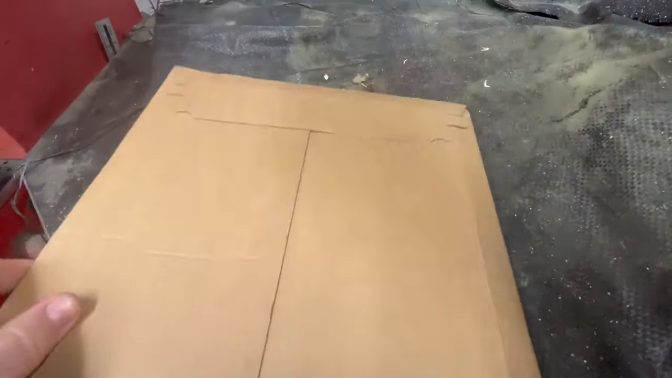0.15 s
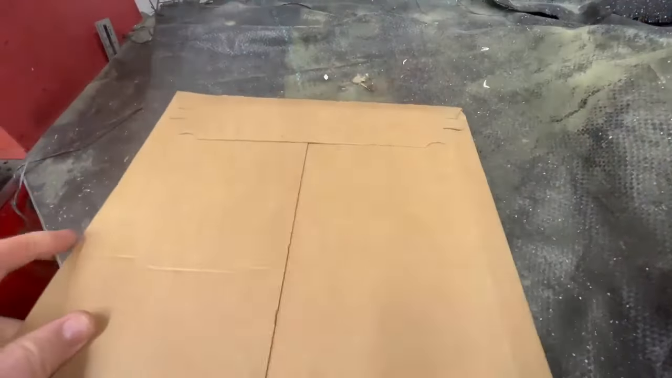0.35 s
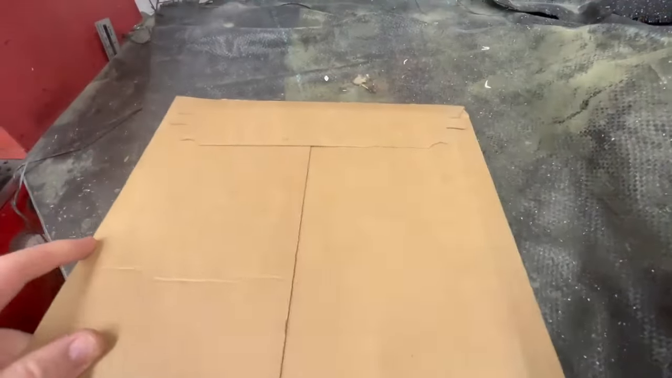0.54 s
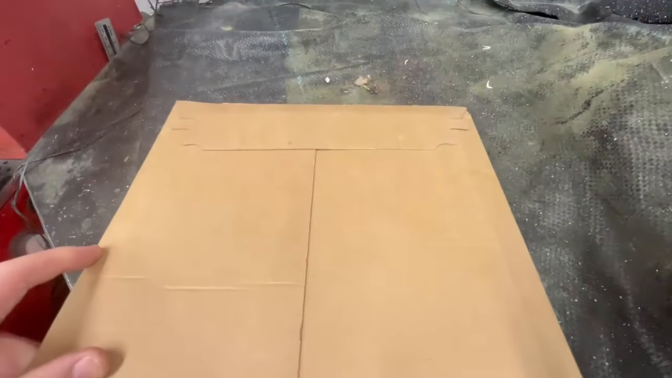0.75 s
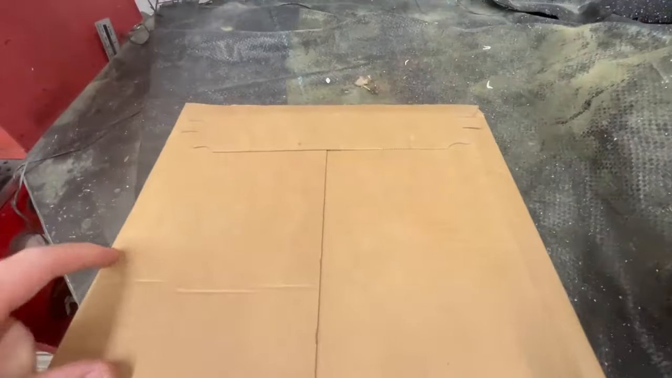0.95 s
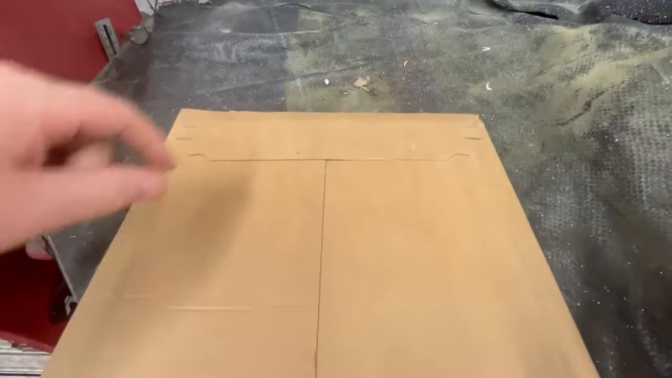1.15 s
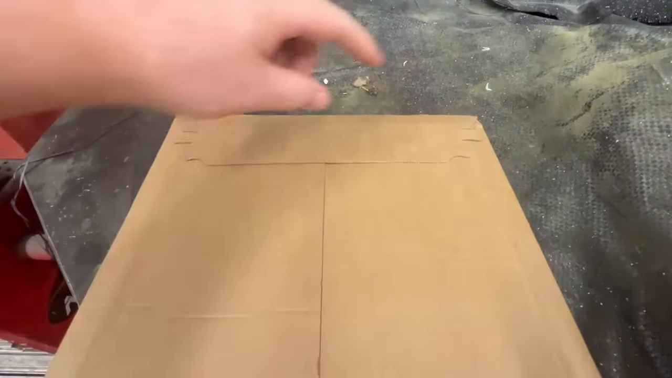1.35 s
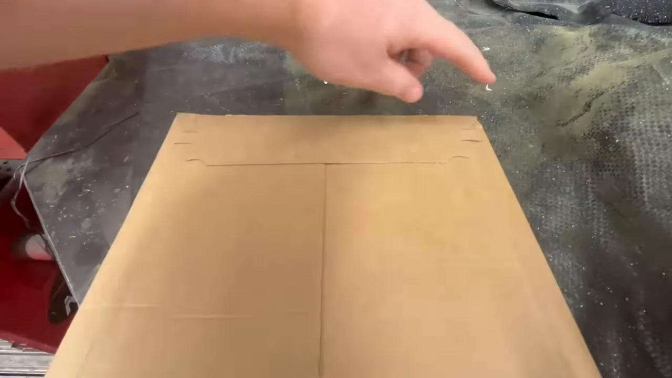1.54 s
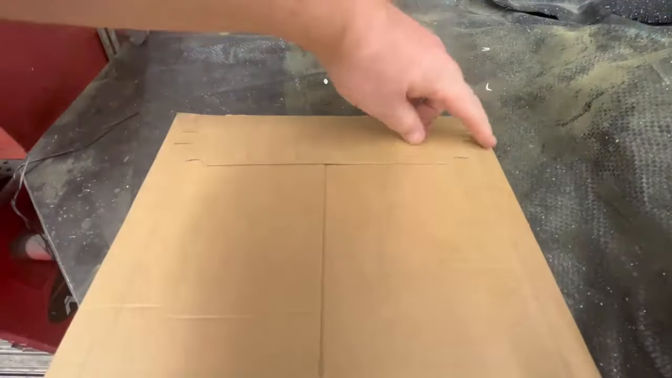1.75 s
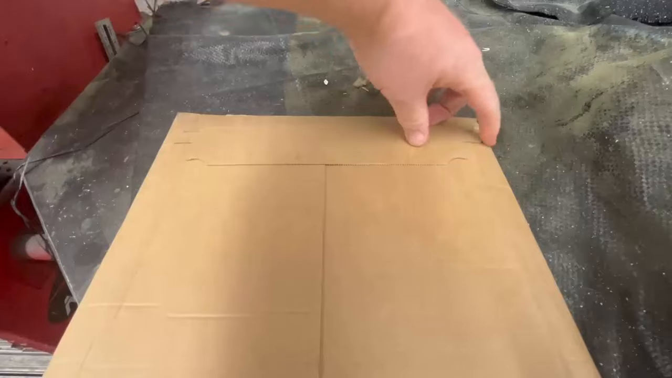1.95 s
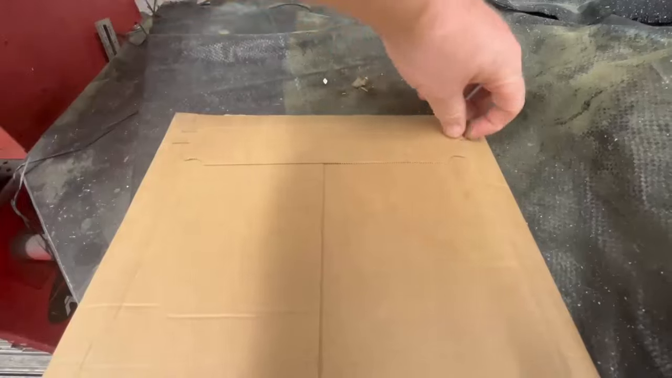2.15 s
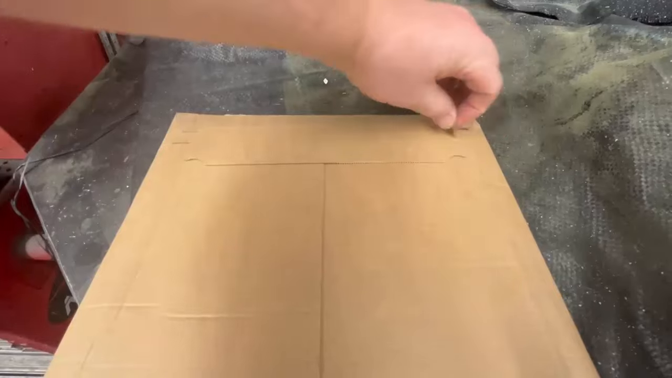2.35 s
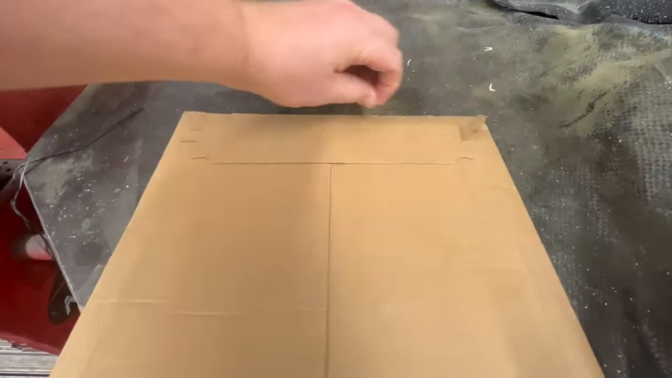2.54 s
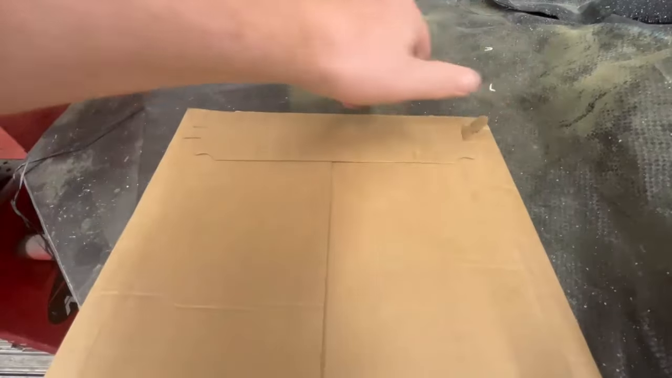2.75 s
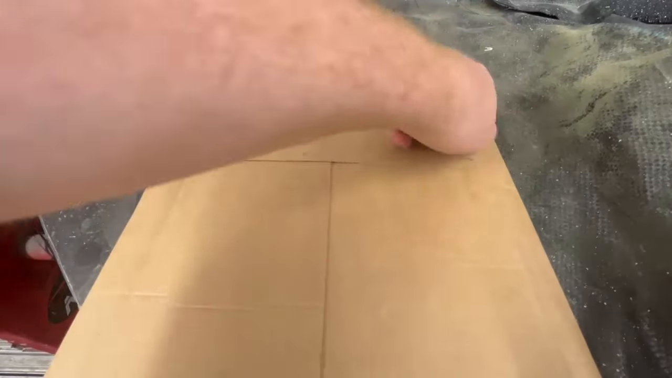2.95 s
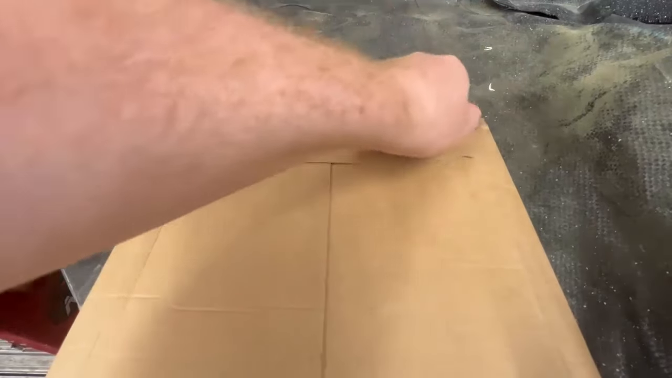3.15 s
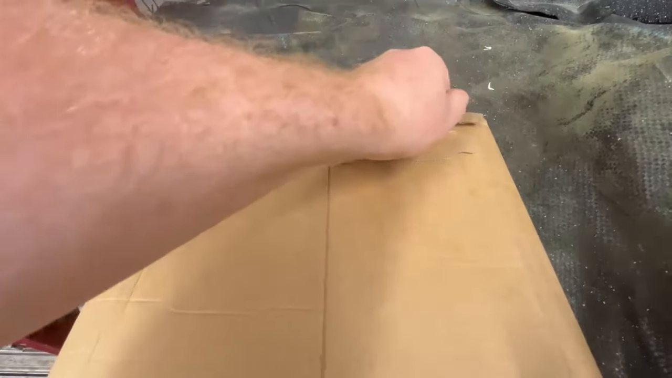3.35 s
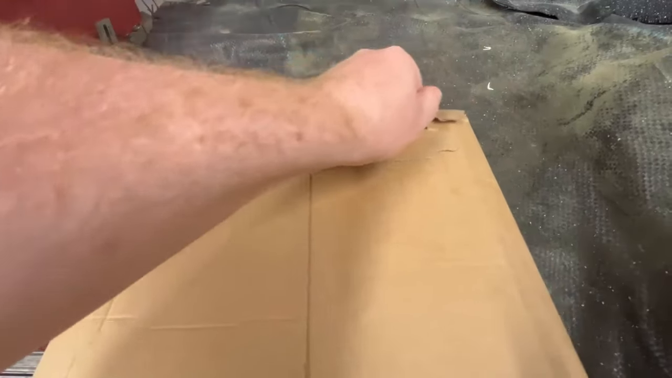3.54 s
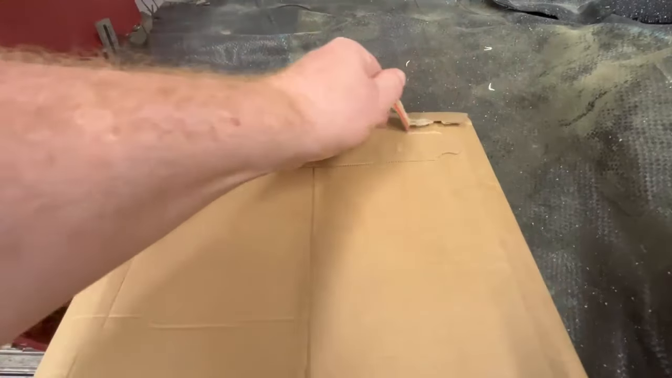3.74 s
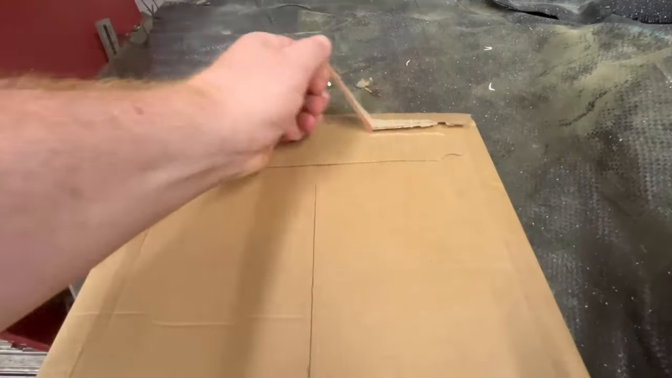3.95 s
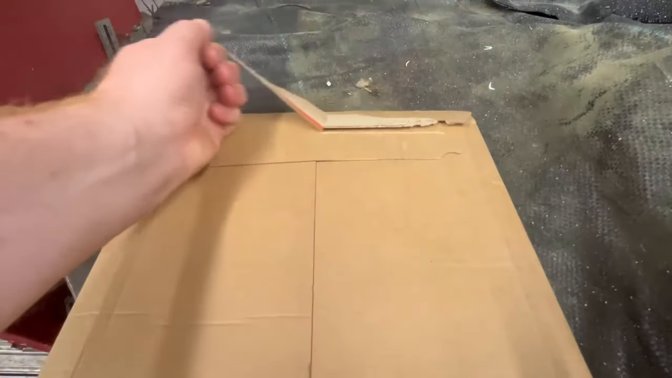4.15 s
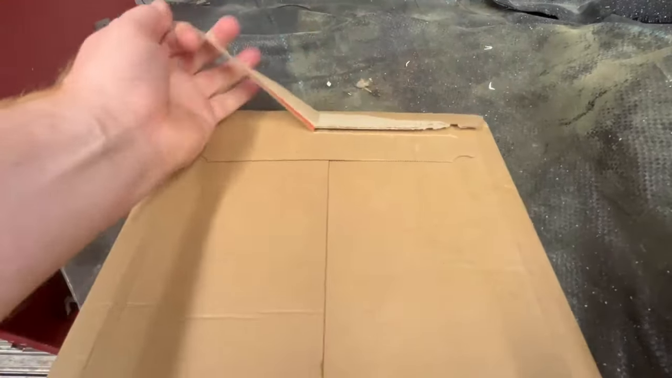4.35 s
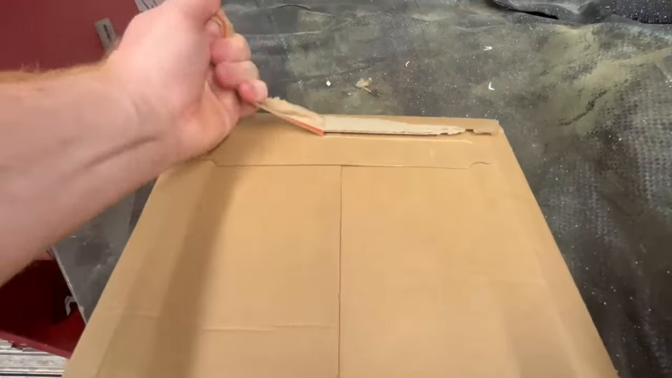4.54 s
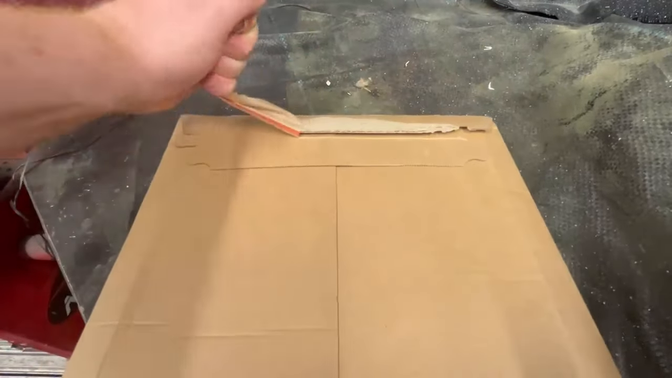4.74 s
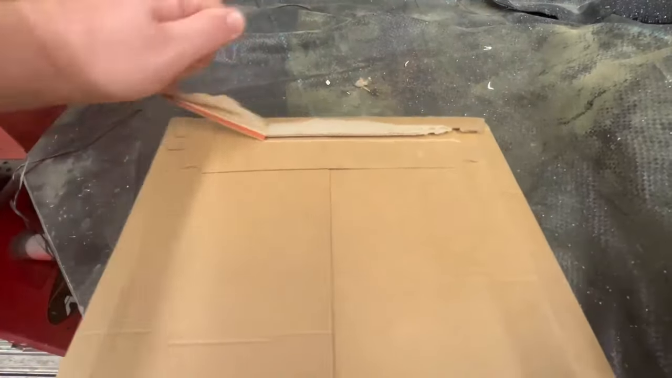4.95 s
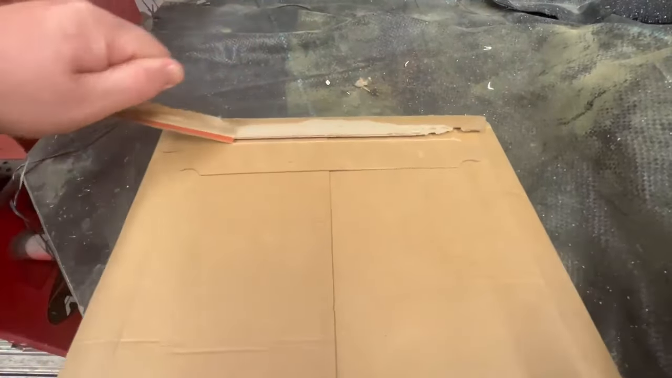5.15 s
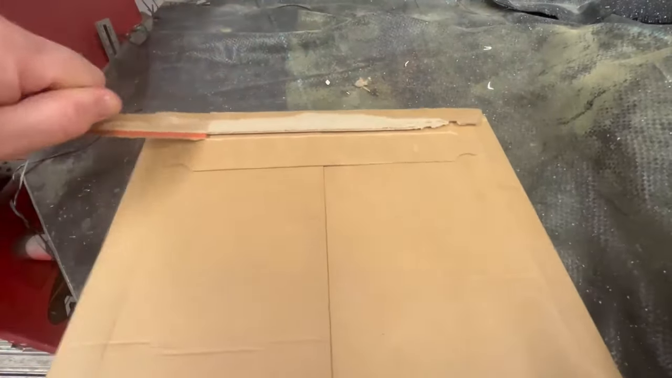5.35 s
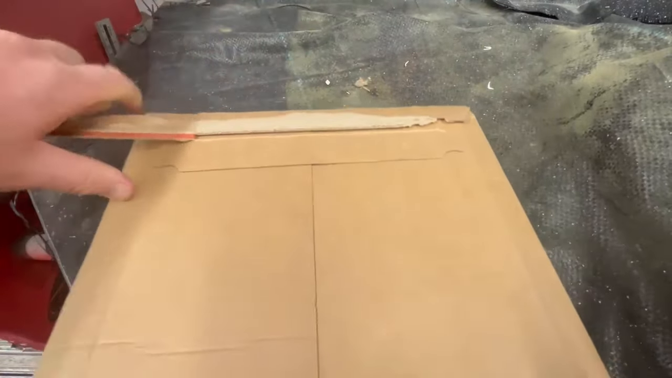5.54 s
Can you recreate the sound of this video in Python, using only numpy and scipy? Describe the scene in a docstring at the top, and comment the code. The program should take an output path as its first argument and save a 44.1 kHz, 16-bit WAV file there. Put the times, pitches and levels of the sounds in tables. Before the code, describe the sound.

Quiet rubbing and small knocks of a cardboard mailer, a hollow pop, then loud dry tearing along perforations, close up in a small workshop.

```python
"""Stiff card rasps over a workbench in faint room air; nails pick at a tab, then the mailer rips along its tear strip.
Rubbing is fine friction grain; knocks and rips are short bursts of cracks, each with a low thump.
The tear, one long pull among shorter tugs, is a train of snapping perforations with sprays of breaking fibres.
The sheet carries its plucks as bending waves whose lows arrive last; a small room and a pair of ports shape the stereo."""
import sys
import numpy as np
from scipy import signal
from scipy.fft import rfft, irfft, next_fast_len
from scipy.io import wavfile
from scipy.ndimage import uniform_filter1d

SR = 44100
rng = np.random.default_rng(int(sys.argv[2]) if len(sys.argv) > 2 else 0)


def bounce(signal):
    """Save signal as a 16-bit WAV file at the path given by the first command-line argument."""
    frames = np.transpose(np.atleast_2d(signal))
    limited = np.clip(frames, -1, 1)
    pcm = np.round(limited * 32767).astype(np.int16)
    wavfile.write(sys.argv[1], SR, pcm)


N = 246519
TIME = np.arange(N) / SR
SIZE = next_fast_len(N + SR // 2)  # room for tails
HZ = np.maximum(np.arange(SIZE // 2 + 1) * SR / SIZE, 1)
HALVES = np.array([[.5], [-.5]])  # splits a left-right difference between the ports


def from_db(db):
    """Decibels to gain."""
    return np.exp(np.asarray(db) * (np.log(10) / 20))


def to_db(power):
    """Power to decibels."""
    return 10 * np.log10(power + 1e-14)


def in_time(rows):
    """Each column of a curve at every sample."""
    s, *columns = np.transpose(rows)
    return [np.interp(TIME, s, column) for column in columns]


def at_hz(points):
    """A curve over log frequency, read at every frequency."""
    hz, value = np.transpose(points)
    return np.interp(np.log(HZ), np.log(hz), value)


def unit(x):
    """Scale to rms 1."""
    return x / np.sqrt(np.mean(np.abs(x) ** 2) + 1e-20)


def colour(points):
    """A response that passes white noise at unchanged power, thinned below 20 Hz."""
    low_cut = HZ ** 2 / (HZ ** 2 + 20 ** 2)
    return unit(from_db(at_hz(points)) * low_cut)


def through(x, response):
    """Filter by a frequency response."""
    return irfft(rfft(x, SIZE) * response, SIZE)[..., :N]


def drift(per_s):
    """Slow random wandering of spread 1."""
    count = N // 16
    hz = np.arange(count // 2 + 1) * SR / N
    slow = irfft(rfft(rng.standard_normal(count)) / (1 + (hz / per_s) ** 4), count)
    return np.interp(TIME, np.linspace(0, N / SR, count), unit(slow))


def evened(x, span_s):
    """Hold the power near 1 over a short span, keeping the finer grain."""
    power = uniform_filter1d(np.mean(np.atleast_2d(x) ** 2, axis=0), int(span_s * SR))
    return x / np.sqrt(np.maximum(power, 1e-9))


def ports(three, alike):
    """One shared and two separate signals become a left-right pair."""
    alike = np.clip(alike, 0, 1)
    return np.sqrt(alike) * three[0] + np.sqrt(1 - alike) * three[1:]


def panned(pan_db):
    """Left and right gains for a left-right difference."""
    return from_db(pan_db * HALVES)


def grains(per_s, spread_db, alike):
    """Small contacts slip or break: random clicks of uneven size and either sign, rms 1."""
    chance = rng.random((3, N)) * SR / per_s
    hit = chance < 1
    clicks = np.zeros((3, N))
    clicks[hit] = from_db(spread_db * np.minimum(-np.log(chance[hit] + 1e-12), 4))
    signs = 2 * rng.integers(2, size=(3, N), dtype=np.int8) - 1
    return unit(ports(clicks * signs, alike))


def resonance(x, hz, width_hz):
    """A band-pass with gain 1 at its centre, which may move."""
    turn = np.exp(2j * np.pi * np.cumsum(hz * np.ones(x.shape[-1])) / SR)
    r = np.exp(-np.pi * width_hz / SR)
    return 2 * np.real(turn * signal.lfilter([1 - r], [1, -r], x * turn.conj()))


def stroke(start, length, attack_s, release_s):
    """Attack, hold and release of one movement of the hand."""
    age = np.maximum(TIME - start, 0)
    return (1 - np.exp(-age / attack_s)) * np.exp(-np.clip((age - length) / release_s, 0, 30))


# Spectrum of the room's own noise: pitch_hz, relative_db
ROOM_AIR = [(25, -23), (60, 18), (110, 16.5), (180, 0.5), (330, 1.5), (600, -26), (900, -9), (1300, 1),
            (1650, 6), (2100, 1), (3000, -24), (4500, -10.5), (7000, -28), (16000, -47)]


def background(air_db=-63.0, hum_hz=99, hum_width_hz=8, hum_db=-61.0, hum_quiet_db=-71.0):
    """Room air is coloured noise; the wavering low hum is a narrow noise band that swells, then sinks after 1.2 s."""
    air = through(ports(rng.standard_normal((3, N)), 0.2), colour(ROOM_AIR))
    hum_band = unit(1 / (1 + ((HZ - hum_hz) / hum_width_hz) ** 2))
    hum = evened(through(rng.standard_normal(N), hum_band), 0.48)
    hum_level_db = np.interp(TIME, [0, .6, 1.2, 1.55], [hum_quiet_db, hum_db, hum_db, hum_quiet_db])
    return from_db(air_db) * air + hum * from_db(hum_level_db)


# Card sliding on the bench and under the hands, before layer trims: start_s, length_s, body_db, hiss_db
RUB_STROKES = [(-0.05, 0.25, -58, -58.5), (0.17, 0.76, -66.5, -69), (0.43, 0.43, -60, -66),
               (0.764, 0.19, -55.5, -56.5), (1.001, 0.2, -62.5, -63), (1.248, 0.23, -73.5, -76),
               (1.79, 0.077, -73, -70.5), (1.926, 0.12, -73.5, -72), (2.011, 0.097, -64, -60),
               (2.391, 0.077, -53.5, -56.5), (2.524, 0.028, -60, -63), (2.617, 0.21, -70.5, -71.5),
               (2.945, 0.026, -66.5, -58), (2.961, 0.0087, -55, -57.5), (3.054, 0.17, -63, -65),
               (3.182, 0.066, -53.5, -51.5), (3.389, 0.91, -52.5, -55)]
RUB_ATTACK_SHARE, RUB_RELEASE_S = 0.096, 0.059  # a longer rub starts more gently


def rubbing_levels():
    """Body and hiss dB of all the rubs, their powers added."""
    power = 0
    for start, length, body_db, hiss_db in RUB_STROKES:
        force = stroke(start, length, RUB_ATTACK_SHARE * length, RUB_RELEASE_S)
        power = power + np.outer(from_db([body_db, hiss_db]), force) ** 2
    return to_db(power)


# Spectrum of the rubbed card's body: pitch_hz, relative_db
RUB_BODY = [(60, -7), (110, 1), (190, -6.5), (300, -3.5), (450, -8), (650, -15), (850, -16), (1200, -8.5),
            (1550, -4), (2000, -12), (2600, -17.5), (5000, -86)]
# Spectrum of the rubbing surface's hiss: pitch_hz, relative_db
RUB_HISS = [(1200, -34), (2400, -3.5), (3300, 3.5), (4500, 2.5), (6000, -0.5), (7200, -10), (10500, -5),
            (13000, -21.5), (16000, -9)]


def slide(body_trim_db=3.5, hiss_trim_db=2.0, patchy_db=1.5, catch_db=-2.5):
    """Dry friction is very fine grains; nail catches grow stronger once the fingers pick at the tab."""
    body_db, hiss_db = rubbing_levels()
    catches = grains(220, 3.0, .6) * np.interp(TIME, [1.7, 2.1], [.2, 1])
    friction = grains(20000, 2.0, 0.13) + from_db(catch_db) * catches
    friction = friction * from_db(patchy_db * drift(23.5))
    body = through(friction * from_db(body_db + body_trim_db), colour(RUB_BODY))
    hiss = through(friction * from_db(hiss_db + hiss_trim_db), colour(RUB_HISS))
    return body + hiss


def squeak(s=1.465, length_s=.014, from_hz=3600, to_hz=2300, level_db=-56.0):
    """One tiny falling sine squeak as the hand lets go."""
    progress = np.clip((TIME - s) / length_s, 0, 1)
    hz = from_hz + (to_hz - from_hz) * progress
    return from_db(level_db) * np.sin(np.pi * progress) * np.sin(2 * np.pi * np.cumsum(hz) / SR)


# Fingertips and the loose strip scuffing the card: start_s, length_s, level_db, pitch_hz
SCUFF_STROKES = [(1.754, 0.074, -78, 328), (2.417, 0.085, -52, 1400), (2.521, 0.062, -60.5, 613),
                 (2.962, 0.033, -50.5, 2390), (3.074, 0.073, -61, 3980), (3.094, 0.13, -58.5, 1150),
                 (4.317, 0.16, -53, 2020), (5.325, 0.043, -47.5, 1270), (5.411, 0.091, -57, 3698),
                 (5.534, 0.073, -56, 1920)]


def scuffs(width_share=0.53):
    """Each scuff is a short swell of uneven slips through one broad resonance, applied twice."""
    out, slips = np.zeros((2, N)), grains(1200, 6.8, 0.15)
    for s, length, db, hz in SCUFF_STROKES:
        at = np.arange(int(s * SR), min(int((s + length) * SR), N))
        rasp = resonance(slips[:, at], hz, width_share * hz)
        rasp = resonance(rasp, hz, width_share * hz)
        out[:, at] += from_db(db) * unit(rasp * np.hanning(len(at)) ** .5)
    return out


# The tab buckling with a hollow pop: start_s, level_db before the rise, pitch_hz, t60_s
TAB_POPS = [(3.176, -33, 318, .04), (3.2257, -8.5, 310, 0.037), (3.782, -21, 408, 0.046)]


def pops(rise_s=0.0032, size=8192):
    """A buckle sets one low mode of the flap ringing as a decaying sine."""
    out, age = np.zeros(N), np.arange(size) / SR
    for s, db, hz, t60 in TAB_POPS:
        at = int(s * SR)
        swell = from_db(db - 60 * age / t60) * (1 - np.exp(-age / rise_s))
        out[at:at + size] += swell * np.sin(2 * np.pi * hz * age)
    return out


# The mailer rocking on the bench, before wavering: start_s, length_s, level_db, first_hz, last_hz, left_lead_rad
ROCKING_SWINGS = [(3.669, 0.44, -34.5, 62.1, 67.8, 2.2), (4.201, 0.036, -26, 123, 113, 0.23),
                  (4.356, 0.04, -49, 64, 59, 0.3), (4.574, 0.011, -43, 85, 60.4, 0.3),
                  (4.726, 0.031, -34, 80, 58.5, 1.02), (4.775, 0.14, -41.5, 57, 54.6, 2.74),
                  (4.915, 0.048, -32.5, 73, 87, 0.3), (5.023, 0.038, -28.5, 131, 85, 0.2),
                  (5.072, 0.038, -42, 69.5, 60, 0.4), (5.188, 0.058, -32, 69.6, 95, 0.2),
                  (5.246, 0.038, -31, 97.75, 58, 0.51), (5.353, 0.021, -43, 81, 63, 0.32)]
SWAY_ATTACK_S, SWAY_RELEASE_S = 0.0054, 0.011


def sways(waver=0.088, uneven_db=2.5, size=22050):
    """The whole mailer rocks on the bench: low sines glide and waver, out of step between the ports."""
    out, age = np.zeros((2, N + size)), np.arange(size) / SR
    speed, strength = np.exp(waver * drift(43)), from_db(uneven_db * drift(21))
    for start, length, db, from_hz, to_hz, lead in ROCKING_SWINGS:
        at = np.arange(size) + int(start * SR)
        hz = np.interp(age, [0, length], [from_hz, to_hz]) * speed[at % N]
        turn = 2 * np.pi * np.cumsum(hz) / SR
        release = np.exp(-np.maximum(age - length, 0) / SWAY_RELEASE_S)
        swing = (1 - np.exp(-age / SWAY_ATTACK_S)) * release * strength[at % N]
        out[:, at] += from_db(db) * swing * np.sqrt(2) * np.sin(turn + lead * HALVES)
    return out[:, :N]


def bending(delay_s=.007, at_pitch_hz=300, slope=0.9024):
    """Bending waves in card are slower the lower they are: a click becomes a falling chirp."""
    late = delay_s * (np.maximum(HZ, 70) / at_pitch_hz) ** -slope
    return np.exp(-2j * np.pi * np.cumsum(late) * SR / SIZE)


# Spectrum of the ringing sheet: pitch_hz, relative_db
BOARD_COLOUR = [(150, -17), (260, 1), (330, 4), (395, 1), (470, 0), (580, -7.5), (740, -5), (860, -9.5),
                (1000, -2.5), (1200, 0.5), (1600, -2.5), (2000, -7.5), (2600, -9.5), (4500, -26)]
# Spectrum of the breaking fibres: pitch_hz, relative_db
FIBRE_COLOUR = [(900, -60), (2000, 3), (2900, 1.5), (3600, 4), (4500, 3.5), (5800, 3), (7000, 2.5),
                (8500, -6.5), (13000, -33)]
# Spectrum of the finest splinters: pitch_hz, relative_db
SPLINTER_COLOUR = [(4500, -9), (7000, 1), (8500, 7.5), (10200, 8.5), (12500, 7.5), (14000, 3.5),
                   (16000, 1.5), (18000, -84)]
# Left-right balance of the ringing sheet, wavering by a few dB: time_s, left_minus_right_db
SHEET_PAN = [(3.2, 0), (3.7, 0.5), (4.0, 2), (4.5, -2), (5.0, 1.5)]


def card(board, fibre, splinters, splinter_width=0.13):
    """The sheet rings in the middle range; fibres crackle straight into the air, the finest from nearly one spot."""
    centre = splinters.mean(axis=0)
    splinters = centre + splinter_width * (splinters - centre)
    board = board * panned(in_time(SHEET_PAN)[0])
    ringing = through(board, colour(BOARD_COLOUR) * bending())
    return ringing + through(fibre, colour(FIBRE_COLOUR)) + through(splinters, colour(SPLINTER_COLOUR))


def thump(hz, sag_db, octaves=0.56, top_hz=450, sag_hz=70, sag_octaves=0.75,
          delay_s=0.005184, slope=1.4, size=8192):
    """The sheet's falling answer to one blow, with unit energy: a knock plus a lower sag of the whole sheet."""
    f = np.maximum(np.arange(size // 2 + 1) * SR / size, 1)
    late = delay_s * (np.maximum(f, 92) / 300) ** -slope
    phase = -2j * np.pi * np.cumsum(late) * SR / size
    knock = np.exp(-.5 * (np.log2(f / hz) / octaves) ** 2) / (1 + (f / top_hz) ** 4)
    sag = from_db(sag_db) * np.exp(-.5 * (np.log2(f / sag_hz) / sag_octaves) ** 2)
    # the wave also comes back from the edges, by longer paths
    edges = sum(rng.uniform(-.35, .35) * np.exp(phase * rng.uniform(1.4, 3.2)) for edge in range(3))
    wave = irfft((knock + sag) * (np.exp(phase) + edges))
    return wave / np.linalg.norm(wave)


# Low knocks of the sheet, before layer trims: bumps by fingers and edges, and extra thumps under some rips:
# start_s, thump_db, thump_hz, board_db, sag_db (against the main part of the thump)
SHEET_KNOCKS = [(0.799, -35.5, 102, -52, 6), (1.168, -45, 120, -54, 8), (1.752, -54, 340, -62, 11),
                (1.761, -48.5, 273, -58, 0), (1.782, -55.5, 170, -64, 9), (1.91, -53.5, 169, -59.5, 5),
                (2.126, -43.5, 170, -50.5, 12), (2.16, -41, 280, -41.5, -1.5),
                (2.458, -41, 257, -46.5, 6.5), (2.572, -49, 196, -56, 1), (2.952, -41, 198, -48, 7.5),
                (3.543, -46, 140, -49, -2), (3.5722, -32.5, 228, -34.5, 7), (4.553, -35.5, 310, -78, 7.5),
                (4.619, -38, 238, -62, 5.5), (4.685, -35.5, 240, -50, -6), (4.901, -38.5, 280, -41, 0),
                (5.338, -46, 89.7, -60, 2), (5.547, -43, 203, -55, 1)]
KNOCK_FIBRE_DB, KNOCK_BRIGHT_DB, KNOCK_LENGTH_S = -12.5, -3.5, 0.00097  # fibres to board, splinters to fibres
# Nail picks, single rips and the loudest cracks, before layer trims:
# start_s, fibre_db, depth_db (board over fibres), length_s
SINGLE_RIPS = [(0.7996, -64, 15.5, 0.00087), (2.033, -51, -7.5, 0.0011), (2.268, -66, 1, 0.0047),
               (2.278, -59.5, -8, 0.0073), (2.3, -40, -1.5, 0.0018), (2.308, -48, 0, 0.0012),
               (2.327, -56, -4, 0.0019), (3.057, -59, -15, 0.2), (3.108, -59, -1, 0.0013),
               (3.126, -69, 1, .002), (3.15, -62, -1, 0.0026), (3.1719, -43, 1, 0.0092),
               (3.221, -34, 6, 0.0027), (3.278, -48.5, 4, 0.0056), (3.339, -59, 2, 0.0021),
               (3.385, -53.5, 5, 0.0014), (3.62, -33.5, 11, 0.00082), (3.6424, -32, 6, 0.0071),
               (3.679, -34.5, 2.5, 0.0065), (3.725, -38.5, -0.5, 0.012), (3.777, -33.5, 1, 0.018),
               (3.825, -41.5, 4, 0.007), (3.864, -51, 8, 0.0013), (3.875, -40.5, 4, 0.002),
               (3.888, -38.5, 1, 0.004), (3.946, -39, 6, 0.0011), (3.973, -40.5, 7.5, 0.0023),
               (4.105, -47, 8.5, 0.0022), (4.124, -40, 7, 0.0029), (4.174, -46, 9.5, 0.0033),
               (4.272, -52, 0, 0.0026), (4.415, -41, -2.5, 0.003), (4.465, -45, -2, 0.00083),
               (4.483, -48, -1, 0.0016), (4.5521, -37, -9, 0.0071), (4.613, -38, -6.5, 0.009),
               (4.6542, -36, -4.5, 0.011), (4.67, -53, -5, 0.0027), (4.684, -35.5, -1, 0.0072),
               (4.698, -39.5, -7, 0.0014), (4.708, -50, -3, 0.0017), (4.849, -57, -9, 0.00089),
               (4.896, -43, -8, 0.032), (4.911, -40.5, -9, 0.003), (4.933, -40, -1, 0.0031),
               (4.9685, -39.5, 8, 0.0023), (4.974, -38, 5.5, 0.0012), (4.989, -38, 4, 0.0016),
               (5.021, -45, 3, 0.0039), (5.083, -49.5, 2.5, 0.0012), (5.159, -45, -1.5, 0.0099),
               (5.243, -41.5, 7.5, 0.0024), (5.326, -50, -3, 0.015), (5.341, -46.5, -4, 0.004)]
# a deeper rip is duller and knocks the sheet harder; thump is against the board level
RIP_BRIGHT_DB, DULL_PER_DEPTH, RIP_THUMP_DB, RIP_THUMP_HZ, RIP_SAG_DB = -4, 1, -3, 260, 6.5


def blows():
    """Every knock and rip: start_s, thump_db, thump_hz, sag_db, board_db, fibre_db, bright_db, length_s."""
    rows = []
    for s, db, hz, board_db, sag_db in SHEET_KNOCKS:
        fibre_db = board_db + KNOCK_FIBRE_DB
        rows.append((s, db, hz, sag_db, board_db, fibre_db, KNOCK_BRIGHT_DB, KNOCK_LENGTH_S))
    for s, fibre_db, depth, length in SINGLE_RIPS:
        board_db = fibre_db + depth
        bright_db = RIP_BRIGHT_DB - DULL_PER_DEPTH * depth
        rows.append((s, board_db + RIP_THUMP_DB, RIP_THUMP_HZ, RIP_SAG_DB, board_db, fibre_db, bright_db, length))
    return rows


def snaps(thump_trim_db=0.0, board_trim_db=0.0, fibre_trim_db=-3.5, splinter_trim_db=5.0,
          rise_s=0.00034, rise_share=0.052, settle_db=-34.5, settle_s=0.04, size=8192):
    """A snap is a dying burst of cracks and one thump; levels are energy spread over 10 ms."""
    low, board, fibre, splinters = np.zeros((4, 2, N + size))
    cracks, stragglers = grains(14000, 4.9, 0.38), grains(500, 5.5, 0.88)
    age = np.arange(size) / SR
    for s, low_db, low_hz, sag_db, board_db, fibre_db, bright_db, length in blows():
        at = np.arange(size) + int(s * SR)
        # a few late cracks follow as the bent card settles
        settling = stragglers[:, at % N] * from_db(settle_db) * np.exp(-age / settle_s)
        burst = cracks[:, at % N] * np.exp(-age / length) + settling
        burst = burst * (1 - np.exp(-age / (rise_s + rise_share * length)))
        burst = burst / np.sqrt(np.sum(burst ** 2) / 2 + 1e-20)
        low[:, at] += thump(low_hz, sag_db) * from_db(low_db + thump_trim_db)
        board[:, at] += burst * from_db(board_db + board_trim_db)
        fibre[:, at] += burst * from_db(fibre_db + fibre_trim_db)
        splinters[:, at] += burst * from_db(fibre_db + bright_db + splinter_trim_db)
    return np.sqrt(SR / 10 ** 2) * (low[:, :N] + card(board[:, :N], fibre[:, :N], splinters[:, :N]))


TUG_ATTACK_S, TUG_RELEASE_SHARE, TUG_ARCH_DB = 0.0057, 0.1, 7.5  # a longer tug dies more slowly


def tug(start, length, release_s):
    """The force of one tug: it bites quickly, is strongest midway and lets go."""
    progress = np.clip((TIME - start) / length, 0, 1)
    return stroke(start, length, TUG_ATTACK_S, release_s) * from_db(-TUG_ARCH_DB * (2 * progress - 1) ** 2)


# The one long pull on the strip, before layer trims: time_s, flex_db, board_db, fibre_db, splinter_db
STRIP_PULL = [(3.825, -39, -35.5, -43, -38), (3.886, -39, -40, -40.5, -42.5), (3.908, -39, -33, -38.5, -44),
              (3.958, -32, -35, -33.5, -39), (4.002, -39, -35.5, -38, -41), (4.06, -27, -30.5, -35, -40.5),
              (4.12, -21.5, -30.5, -35, -38), (4.227, -22.5, -35.5, -36.5, -33.5),
              (4.275, -31.5, -48, -40.5, -46), (4.305, -46, -69, -64, -55), (4.38, -46.5, -63, -49, -69)]
PULL_EDGE_S = 0.0077  # its onset and fade
# Short tugs before and after it, before layer trims: start_s, length_s, flex_db, board_db, fibre_db
STRIP_TUGS = [(3.603, 0.12, -36, -55, -42.5), (3.737, 0.069, -41, -40, -43), (4.374, 0.13, -44, -44, -43),
              (4.426, 0.054, -47, -44.5, -34), (4.519, 0.31, -50, -52.5, -49.5),
              (4.696, 0.062, -26.5, -35, -33), (4.902, 0.15, -24.5, -29.5, -31.5),
              (5.031, 0.1, -44, -48, -45.5), (5.142, 0.14, -32, -37.5, -38.5),
              (5.288, 0.097, -43, -55, -49.5), (5.384, 0.077, -60, -67, -52),
              (5.465, 0.14, -54, -52.5, -54)]
FLEX_LAG_S, FLEX_RELEASE_S = 0.011, 0.013  # the sheet follows the hand late and sways on
TUG_SPLINTER_DB = -1  # splinters against fibres


def pulling_levels():
    """Flexing, board, fibre and splinter dB of the long pull and the tugs, their powers added."""
    begin, end = STRIP_PULL[0][0], STRIP_PULL[-1][0]
    pull = stroke(begin, end - begin, PULL_EDGE_S, PULL_EDGE_S)
    power = (from_db(in_time(STRIP_PULL)) * pull) ** 2
    for start, length, flex_db, board_db, fibre_db in STRIP_TUGS:
        force = tug(start, length, TUG_RELEASE_SHARE * length)
        flexing = tug(start + FLEX_LAG_S, length, FLEX_RELEASE_S)
        power[0] += (from_db(flex_db) * flexing) ** 2
        power[1:] += np.outer(from_db([board_db, fibre_db, fibre_db + TUG_SPLINTER_DB]), force) ** 2
    return to_db(power)


# Speed of the pull, before jitter: time_s, perforations_per_s
TEAR_SPEED = [(3.85, 210), (4.07, 153.6), (4.16, 163.5), (4.22, 126), (4.3, 100), (4.72, 122), (4.78, 70),
              (4.92, 91.4), (4.98, 170), (5.03, 122), (5.1, 59.3), (5.24, 104.5), (5.32, 53.6)]


def perforations(jitter=.14, uneven_db=3.5, heavy_hz=120):
    """One click per bridge of card the strip breaks; the sheet rocks in step, more widely when the pull is slow."""
    per_s, = in_time(TEAR_SPEED)
    passed = np.cumsum(per_s * np.exp(jitter * drift(70))) / SR
    breaks = np.diff(np.floor(passed), prepend=0) * from_db(uneven_db * rng.standard_normal(N))
    rocking = np.sin(2 * np.pi * passed) * (heavy_hz / per_s) ** 2
    return breaks, rocking


def spray(breaks, length_s, steady):
    """The cracks crowd in just after each break, over a steady share."""
    crowding = signal.lfilter([1], [1, -np.exp(-1 / (length_s * SR))], breaks + 1e-18)
    return steady + unit(crowding)


def tinted(cracks, hz, octaves=0.42, per_s=45, width_share=0.26, boost=0.59):
    """A broad resonance wanders at random through the crackle, so its tint keeps changing."""
    centre = hz * 2 ** (octaves * np.clip(drift(per_s), -2, 2))
    return cracks + boost * resonance(cracks, centre, width_share * hz)


# Spectrum of the flexing sheet: pitch_hz, relative_db
FLEX_COLOUR = [(25, -42), (45, -30), (70, -5.5), (125, 0), (170, -3), (220, -4), (300, -13), (400, -16),
               (600, -28), (1500, -71)]


def tear(clump_db=-0.5, flex_trim_db=-6.5, board_trim_db=-3.5, fibre_trim_db=-4.0, splinter_trim_db=0.5,
         rumble=0.91, rocking_db=-2.5):
    """Each broken bridge plucks the sheet and sheds a spray of fibre cracks."""
    flex_db, board_db, fibre_db, splinter_db = pulling_levels()
    breaks, rocking = perforations()
    # bundles snap right at the break; single fibres and their fine splinters trail after it
    kinds = (tinted(grains(1200, 4.2, .7), 1150) * spray(breaks, .004, .22),
             tinted(grains(1200, 4.3, .45), 5000, octaves=.25) * spray(breaks, .005, .3),
             tinted(grains(2800, 3.6, .55), 9500, octaves=.3) * spray(breaks, .01, .45))
    bundles, fibres, splinters = [evened(cracks * from_db(clump_db * drift(28)), 0.048) for cracks in kinds]
    plucks = evened(breaks, 0.043) + rumble * grains(2200, 0.28, 0.15)
    bent = through(plucks, colour(FLEX_COLOUR) * bending())
    flexing = evened(bent + from_db(rocking_db) * rocking, 0.031)
    crackle = card(bundles * from_db(board_db + board_trim_db),
                   fibres * from_db(fibre_db + fibre_trim_db),
                   splinters * from_db(splinter_db + splinter_trim_db))
    return flexing * from_db(flex_db + flex_trim_db) + crackle


# Resonances shifting as the strip peels back:
# time_s, flap_hz, flap_boost_db, pocket_hz, pocket_boost_db, strip_hz, strip_boost_db
PEELING = [(3.6, 380, 6.5, 1050, 1.5, 4660, 3.5), (3.85, 487, 7, 1090, 7.5, 4630, 10.5),
           (3.95, 423, 7.5, 1130, 6.5, 4400, 6), (4.06, 375, 2, 1060, 3, 4660, 2.5),
           (4.15, 357, 4.5, 950, 6.5, 5600, 6.5), (4.45, 300, 4, 1220, 0.5, 5290, 8),
           (4.75, 310, 0, 1240, -6.5, 5600, 5.5), (5.0, 390, 3.5, 1450, 1.5, 5840, 4),
           (5.26, 290, -2.5, 1240, -4.5, 5660, 4.5)]


def opening(x, flap_width_hz=90, pocket_width_hz=260, strip_width_hz=650):
    """Moving resonances: the pocket's boost is strong in the long pull, then wavers between dip and slight boost;
    the flap's note wanders and the strip's tends upward."""
    flap_hz, flap_db, pocket_hz, pocket_db, strip_hz, strip_db = in_time(PEELING)
    parts = ((flap_hz, flap_db, flap_width_hz),
             (pocket_hz, pocket_db, pocket_width_hz),
             (strip_hz, strip_db, strip_width_hz))
    return x + sum((from_db(db) - 1) * resonance(x, hz, width_hz) for hz, db, width_hz in parts)


# Resonances of the mailer on the bench: pitch_hz, width_hz, boost_db
MAILER_MODES = [(508, 14, 3), (683, 14, 5), (830, 45, 0), (885.6, 10.6, 10), (1001, 10, 4),
                (1127, 9.5, 2.5), (1268, 28, 2.5), (1520, 11, 0), (1866, 21, 9), (3016, 79, 1.5),
                (4440, 69, 0)]


def rings(x):
    """Fixed resonances colour the tearing, knocking and sliding card."""
    response = 1
    for hz, width_hz, boost_db in MAILER_MODES:
        response = response + (from_db(boost_db) - 1) / (1 + 1j * (HZ ** 2 - hz ** 2) / (HZ * width_hz))
    return through(x, response)


def workshop(x, near_db=-2.5, near_t60=0.035, room_db=-8.0, room_t60=0.28, dull_hz=6000, bass_share=0.57):
    """Quick scatter off the bench and a short room tail, different at each port and weaker in bass and treble."""
    age = np.maximum(TIME - .002, 0)
    tail = 0
    for level_db, t60 in ((near_db, near_t60), (room_db, room_t60)):
        echoes = rng.standard_normal((2, N)) * from_db(-60 * np.minimum(age / t60, 4)) * (age > 0)
        tail = tail + from_db(level_db) * unit(echoes) / np.sqrt(N)
    walls = np.interp(HZ, [700, 3000], [bass_share, 1]) / np.sqrt(1 + (HZ / dull_hz) ** 2)
    return x + through(x, rfft(tail, SIZE) * walls)


# Gain on the ports' difference: pitch_hz, difference_db
STEREO_WIDTH = [(40, 21), (70, 6), (125, 2), (280, -13), (550, 4), (1200, -0.5)]
# Phase by which the left port leads: pitch_hz, lead_rad
STEREO_PHASE = [(60, 0), (400, 0.4), (1200, 0.6), (2000, 3), (4500, 2), (6500, -2.8), (8400, -3.3),
                (9200, -5.8), (10800, -7), (12000, -9.4), (13700, -9.5), (14800, -12.4)]


def scene(slide_pan_db=1.0):
    """The card in the room: stereo width varies with pitch and the ports fall out of step in the treble."""
    torn = opening(tear() + snaps())
    handled = rings(torn + slide() * panned(slide_pan_db))
    mailer = workshop(handled + scuffs() + pops() + squeak())
    centre = mailer.mean(axis=0)
    side = through(mailer[0] - centre, from_db(at_hz(STEREO_WIDTH)))
    mailer = centre + side * np.array([[1], [-1]])
    stepped = through(mailer, np.exp(1j * at_hz(STEREO_PHASE) * HALVES))
    return stepped + sways() + background()


# Level difference of the two ports: pitch_hz, left_minus_right_db
STEREO_BALANCE = [(60, -2), (120, -3), (200, 0.8), (380, 0.9), (700, 6.4), (1300, 6.2), (2400, 2.5),
                  (3300, 4), (4500, 10.5), (6000, 9), (8000, 0), (15000, 0)]
CUTOFF_HZ = 15900


def record(dry):
    """Each port has its own colour; the top is cut steeply."""
    sides = panned(at_hz(STEREO_BALANCE))
    return through(dry, sides / np.sqrt(1 + (HZ / CUTOFF_HZ) ** 160))


dry = scene()
out = record(dry)
bounce(out)
```